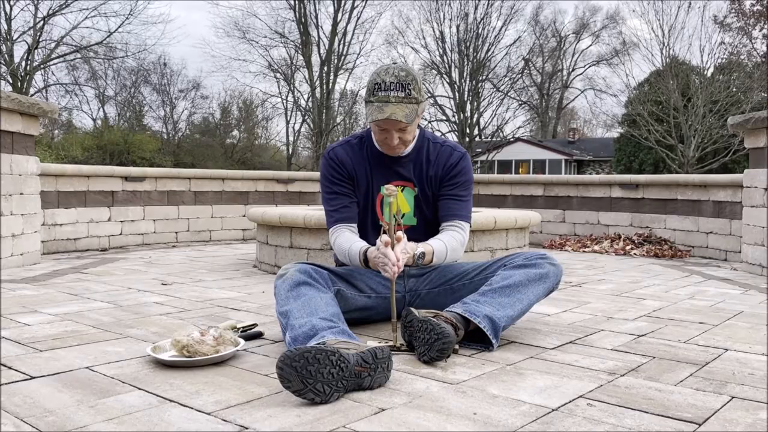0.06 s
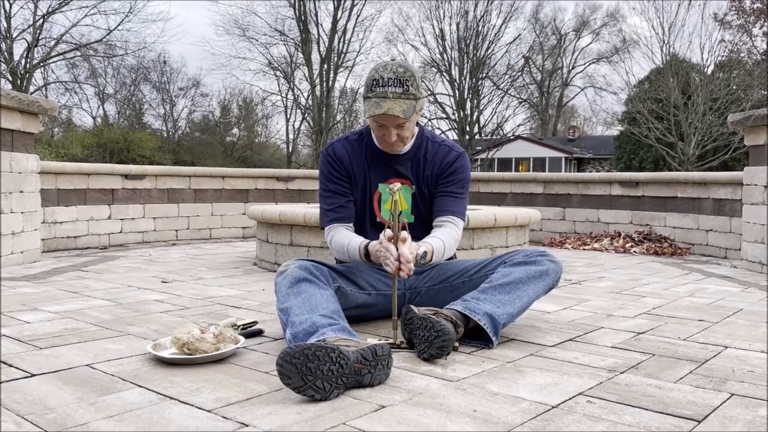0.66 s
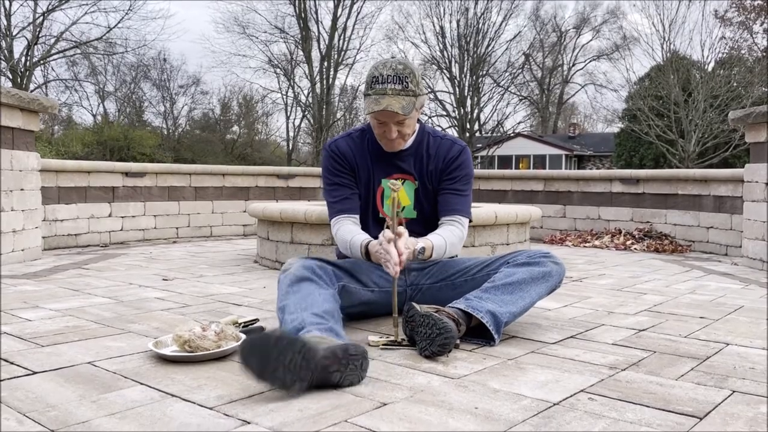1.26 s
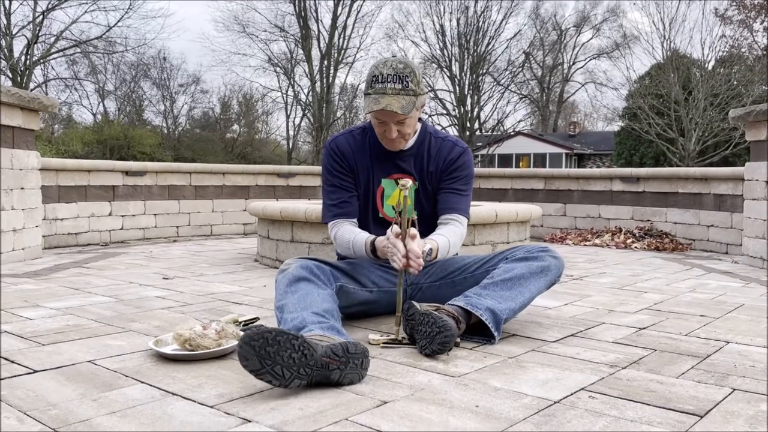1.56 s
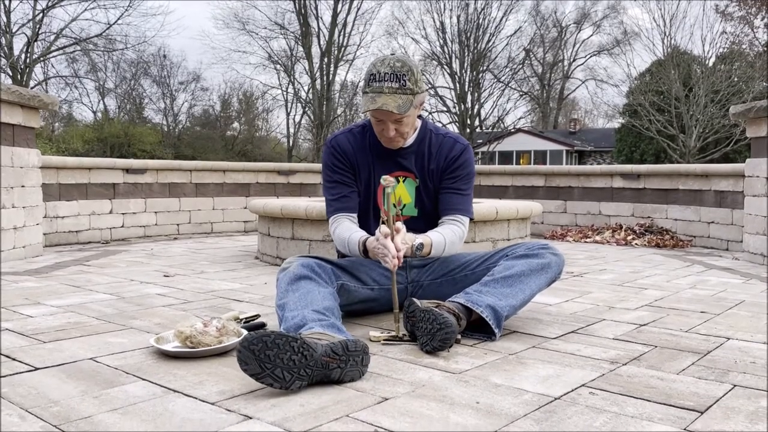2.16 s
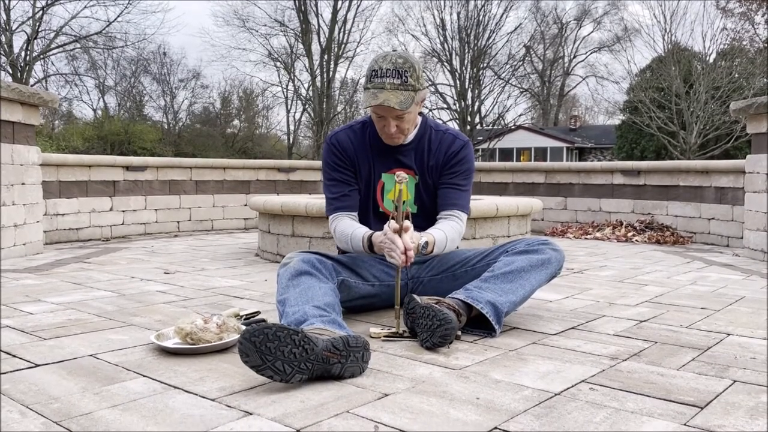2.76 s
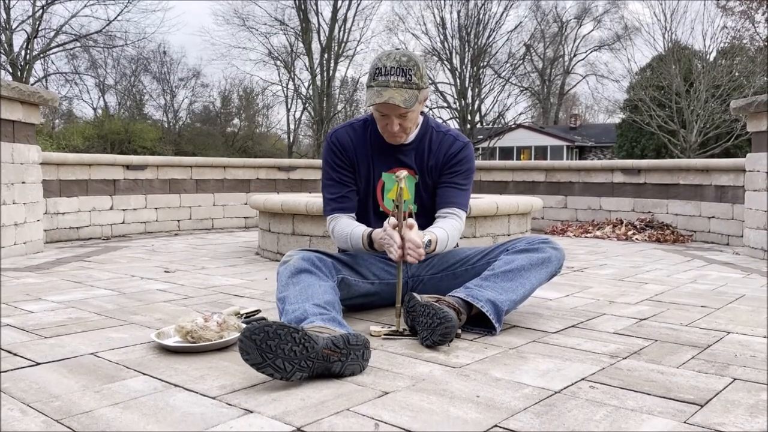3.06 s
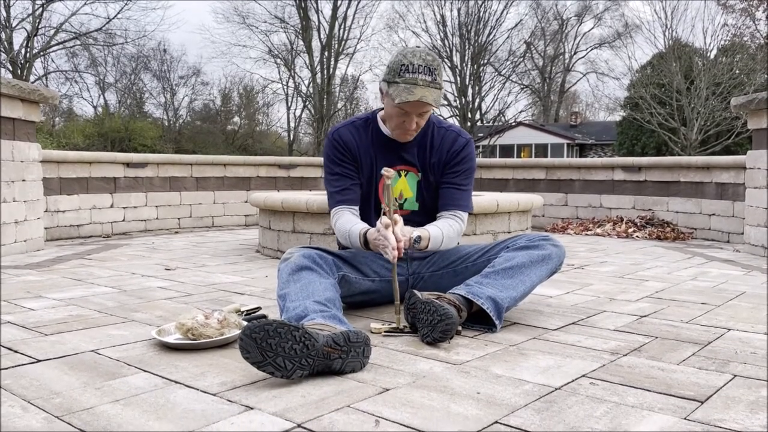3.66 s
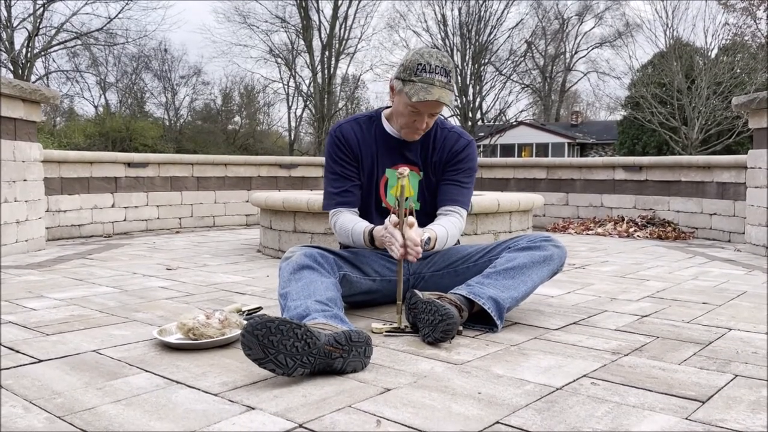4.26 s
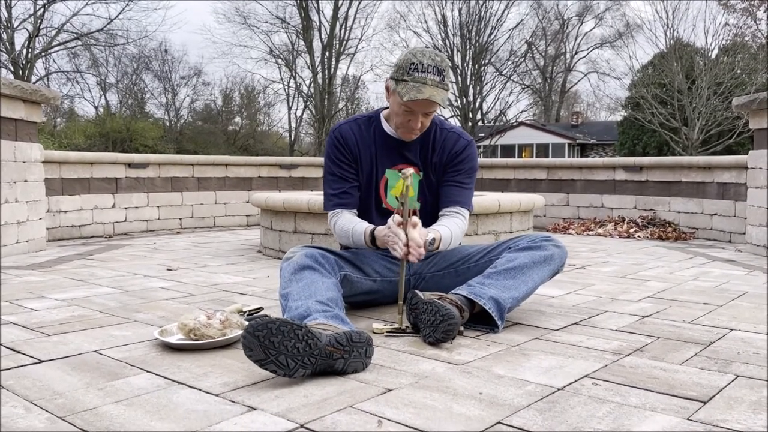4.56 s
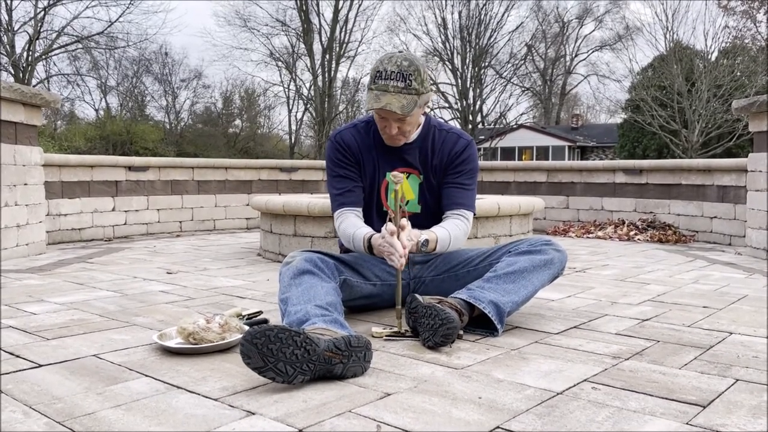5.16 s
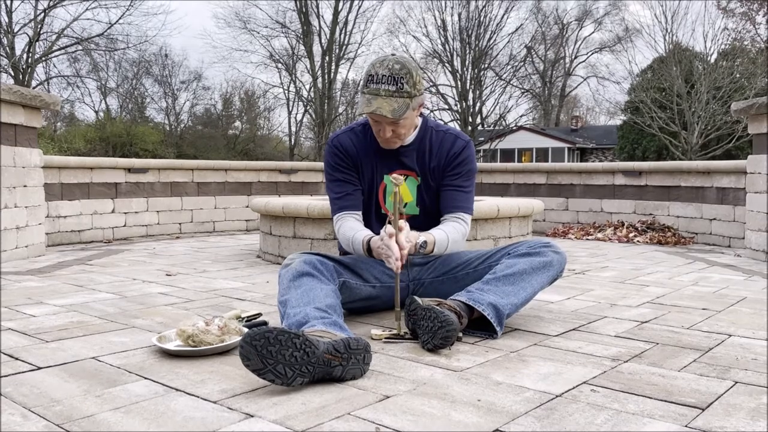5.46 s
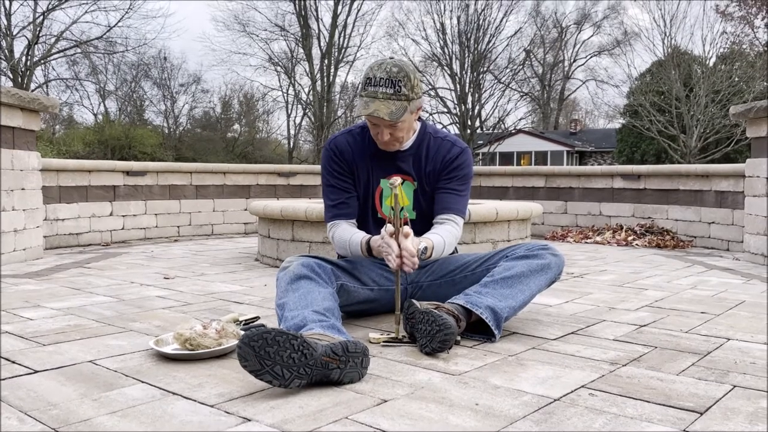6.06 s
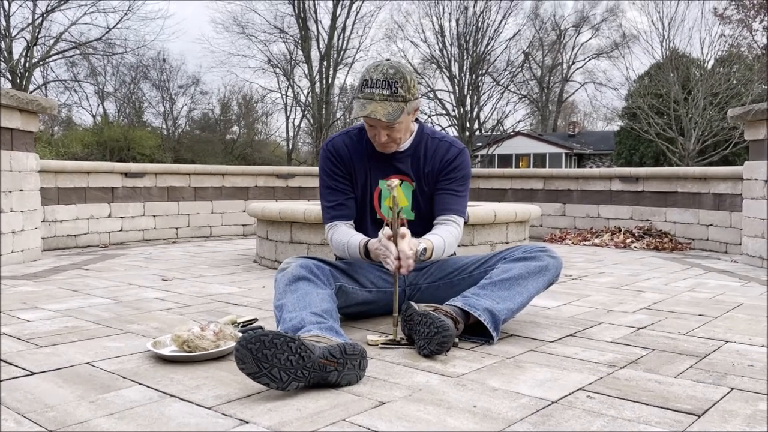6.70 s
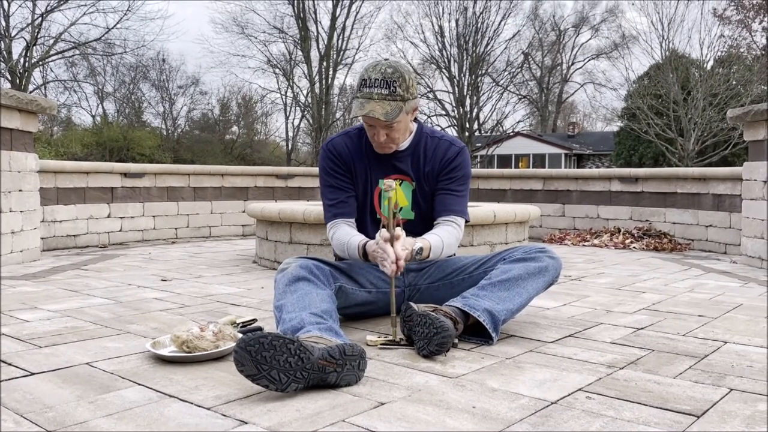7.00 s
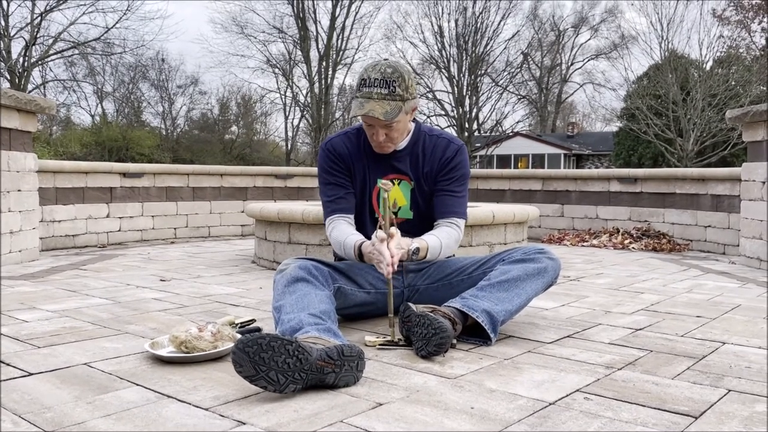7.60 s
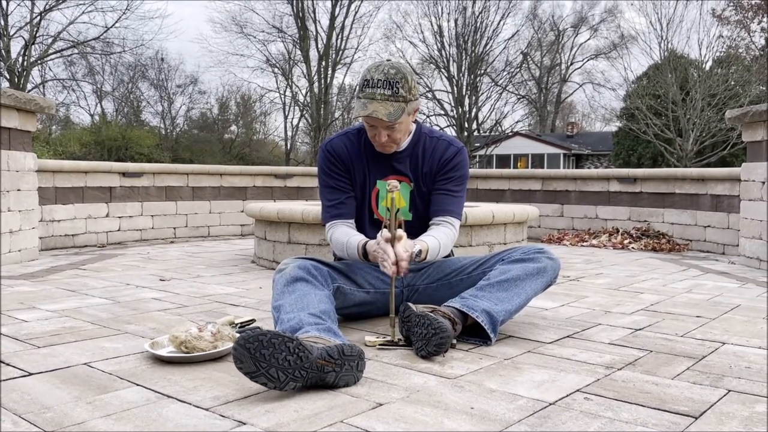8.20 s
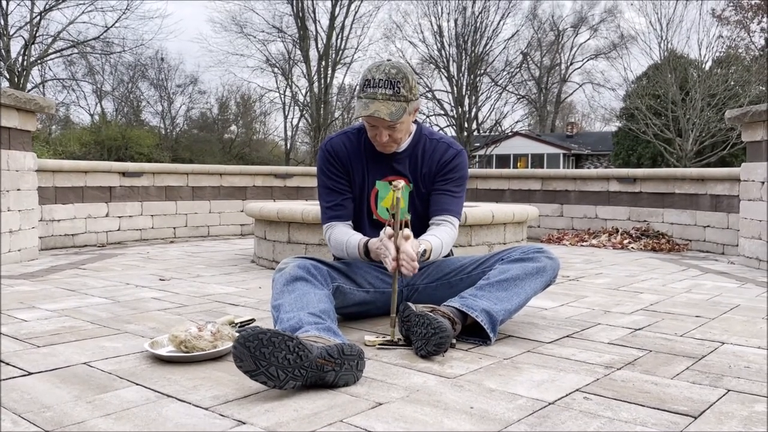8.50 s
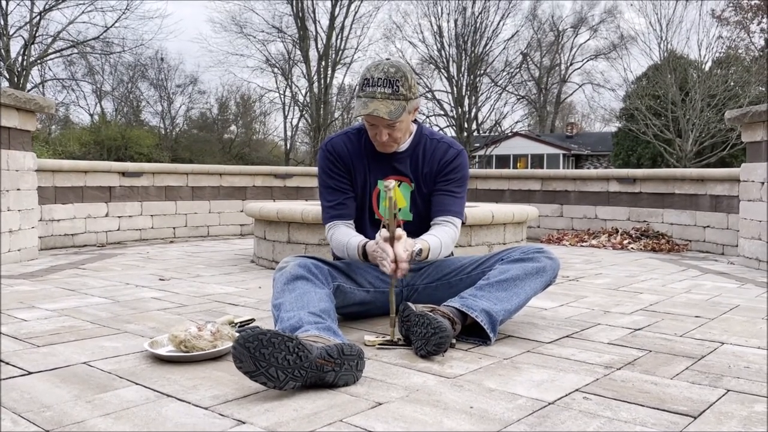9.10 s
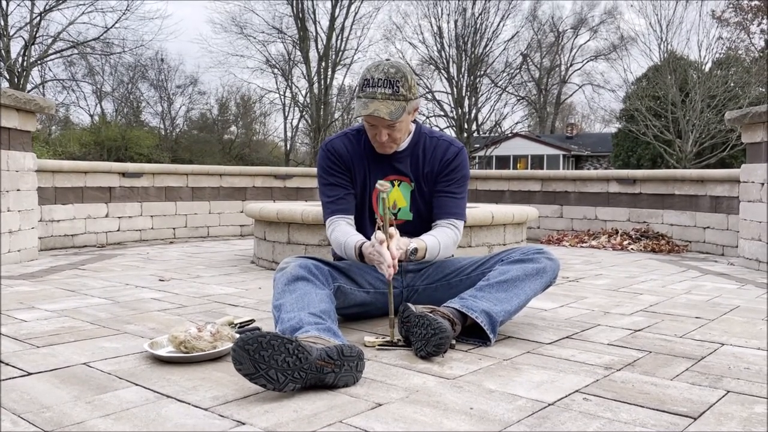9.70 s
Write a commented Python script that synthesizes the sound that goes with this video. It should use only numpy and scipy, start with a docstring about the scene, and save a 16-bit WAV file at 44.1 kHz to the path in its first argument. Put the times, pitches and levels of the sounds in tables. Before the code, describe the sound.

A wooden spindle is spun back and forth on a wooden board, close in front, on an open stone patio. For about ten seconds its dry, raspy rub swells and dies with each stroke, quickening from under five to nearly six strokes a second while growing softer and fuller in tone. Between 1 and 1.4 seconds a boot scuffs gritty paving and taps twice. Tiny gliding squeaks come from about 1.8 to 5.3 seconds, and again near 9. The tip first ticks in its socket around 2.8 seconds, then clicks ever more often from 4 onward, with scattered small hollow knocks. Soft low thumps fall around 2.2 to 2.6 and 4.6 to 5.2 seconds, and a faint bump at 9.3. Distant traffic rumbles and hisses all around throughout, while a deep engine hum swells from 3 to 5.5 seconds and then fades.

```python
"""A wooden spindle is rolled back and forth between the palms on a hearth board, on an open stone patio.
Each stroke is a swell of dry rubbing that dies away as the spindle turns round. The tip squeaks now
and then; as the work speeds up, it catches, ticks and knocks in its socket.
A boot scuffs and taps the gritty paving early on, and a soft bump comes near the end.
A distant engine and traffic drone behind, with a few soft low thumps."""
import sys
import numpy as np
from scipy import signal
from scipy.fft import rfft, irfft
from scipy.io import wavfile

SR = 44100
rng = np.random.default_rng(int(sys.argv[2]) if len(sys.argv) > 2 else 0)


def store_wav(level_fs):
    """Save 16-bit WAV to argv[1]."""
    pcm = np.round(np.clip(np.atleast_2d(level_fs), -1, 1) * 32767)
    wavfile.write(sys.argv[1], SR, pcm.T.astype(np.int16))


N = 434385
TIME = np.arange(N) / SR
HZ = np.maximum(np.fft.rfftfreq(N, 1 / SR), 1)

# hand strokes, quieter as the socket wears smooth: (start [s], relative level [dB])
HAND_STROKES = [(-.17, -60), (.048, -54), (.265, -57), (.491, -55), (.715, -57.5), (.933, -53.5),
                (1.147, -54.5), (1.362, -52.5), (1.563, -53), (1.749, -55.5), (1.945, -54), (2.144, -54),
                (2.342, -53.5), (2.519, -55), (2.718, -55.5), (2.919, -54.5), (3.116, -57), (3.313, -55.5),
                (3.508, -55), (3.687, -56), (3.87, -54.5), (4.052, -56), (4.261, -56.5), (4.448, -56),
                (4.63, -55.5), (4.808, -56.5), (4.998, -56.5), (5.178, -56.5), (5.349, -57.5),
                (5.535, -59.5), (5.718, -57), (5.891, -60), (6.081, -59.5), (6.26, -59.5), (6.434, -62),
                (6.614, -60.5), (6.795, -58), (6.953, -59.5), (7.13, -58.5), (7.292, -59.5), (7.479, -59),
                (7.657, -59.5), (7.826, -58), (8.001, -59.5), (8.169, -59.5), (8.342, -58.5),
                (8.528, -62.5), (8.692, -60.5), (8.869, -62), (9.04, -61.5), (9.207, -60), (9.377, -59.5),
                (9.553, -60), (9.712, -59), (9.88, -59)]
# how sharply the rub peaks in mid-stroke, most in the slow opening: (time [s], exponent of speed [-])
STROKE_PEAKING = [(0, 2.16), (1.3, 0.97), (5, 0.79), (7, 1.17)]
# tone of dry wood under light and under firm pressure: (frequency [Hz], gain [dB])
LIGHT_RUB_EQ = [(500, -30), (800, -13), (1200, -1), (1850, 1.5), (2300, 4.5), (3400, 2.5), (4500, -0.5),
                (5500, 1.5), (6400, 1), (7600, -9), (9500, -4.5), (11500, -10), (13500, -13), (15400, -12)]
FIRM_RUB_EQ = [(500, 5), (800, 9.5), (1200, 4.5), (1850, 0.5), (2300, 2.5), (3400, 4), (4500, -0.5),
               (5500, 0.5), (6400, 0), (7600, -4), (9500, -1.5), (11500, -6.5), (13500, -11), (15400, -7.5)]
def rubbing(level_db, chatter_db, creep, chafe_db, groan_db, sing_db, splinter_db):
    """Speed rises and falls once a stroke; the rub follows it and hardens as the hands bear down."""
    place = strokes_done()
    stroke = place.astype(int)
    rest = .05  # share of a stroke, at each end, for which the spindle all but stands still
    speed = np.sin(np.pi * np.clip((place % 1 - rest) / (1 - 2 * rest), 0, 1))
    firmness = np.clip((TIME - .8) / 5, 0, 1)
    light = friction(LIGHT_RUB_EQ, grains_per_s=1400, spread_db=-1, grain_share=.23)
    firm = friction(FIRM_RUB_EQ, grains_per_s=1200, spread_db=1, grain_share=.29)
    rub = grip(np.sqrt(1 - firmness) * light + np.sqrt(firmness) * firm, stroke)
    chafe = from_db(chafe_db) * chafing(speed, stroke, bend=.12, width_hz=120, spread_db=7.5)
    # the spindle's lowest mode groans on and off; a higher one sings in mid-stroke
    groan = from_db(groan_db + 9 * drift(5)) * rough_tone(1470, width_hz=130)
    sing = from_db(sing_db + 3.3 * drift(2.6)) * rough_tone(3480 * np.exp(.042 * drift(3)), width_hz=73)
    splinter = from_db(splinter_db) * splinters(per_s=400, spread_db=9, edge_hz=6900)
    force_db = np.array(HAND_STROKES)[stroke, 1] + surges() + chatter_db * drift(32)
    peaking, = in_time(STROKE_PEAKING)
    swell = (creep + speed ** peaking) * from_db(force_db + level_db)  # only creep is left at the turns
    return swell * (rub + speed * (chafe + sing) + groan + splinter)


def strokes_done():
    """Running count of hand strokes; whole numbers are the turns."""
    return np.interp(TIME, np.array(HAND_STROKES)[:, 0], np.arange(len(HAND_STROKES)))


# accents within a stroke: (time [s], boost [dB])
PRESSURE_ACCENTS = [(.15, 3.5), (.595, 1.5), (1.88, 3.5), (2.185, 0.5), (2.64, 3.5), (3.735, 2), (5.265, 2),
                    (6.53, 6.5), (7.74, 2.5), (8.08, -1), (8.45, -1), (8.6, 5)]
def surges(width_s=.015):
    """The hands bear down or ease off for a moment; the change in dB."""
    return sum(db * bell(s, width_s) for s, db in PRESSURE_ACCENTS)


def friction(eq, grains_per_s, spread_db, grain_share):
    """Fibres snap as tiny grains over a smooth hiss, coloured by the wood."""
    sizes = from_db(spread_db * np.minimum(rng.exponential(1, N), 4))
    born = rng.random(N) < grains_per_s / SR
    grains = rms_one(rng.standard_normal((2, N)) * sizes * born)
    force = np.sqrt(grain_share) * grains + np.sqrt(1 - grain_share) * rng.standard_normal((2, N))
    gain = from_db(at_hz(eq)) * wood_gain() / np.sqrt(1 + (400 / HZ) ** 4)
    rasp_band = (HZ > 2500) & (HZ < 6500)
    return stereo(force, gain / np.sqrt(np.mean(gain ** 2 * rasp_band)), FRONT_IMAGE)


# resonances of spindle and board: (frequency [Hz], width [Hz], strength [dB])
WOOD_MODES = [(1442, 84, 9.5), (2494, 140, 2.5), (3473, 480, 2), (4090, 164, 6.5), (4540, 100, 3.5),
              (5430, 520, 1.5), (6800, 240, 6)]
def wood_gain():
    """Broad response of spindle and board with their modes standing out of it."""
    peaks = sum(from_db(db) ** 2 / (1 + (2 * (HZ - hz) / width) ** 2) for hz, width, db in WOOD_MODES)
    return np.sqrt(1 + peaks)


def grip(rub, stroke, grip_db=2.2, slide_db=2.2):
    """Each new grip lifts some resonances and damps others; they shift as the palms slide."""
    centres, spacing = np.linspace(1800, 7000, 14, retstep=True)
    spectrum, out = rfft(rub), rub
    for hz in centres:
        band = irfft(spectrum * np.maximum(1 - abs(HZ - hz) / spacing, 0), N)
        colour_db = grip_db * per_stroke(stroke) + slide_db * drift(14)
        out = out + band * (rms_one(from_db(np.minimum(colour_db, 5))) - 1)
    return out


def chafing(speed, stroke, bend, width_hz, spread_db):
    """High spots of the tip rasp in flares, at pitches that are new each stroke and rise with speed."""
    out = 0
    for home_hz in np.geomspace(2100, 5200, 11):
        hz = home_hz * np.exp(.04 * per_stroke(stroke) + bend * (speed - 1))
        out = out + rough_tone(hz, width_hz) * from_db(spread_db * np.minimum(drift(30), 2))
    return rms_one(out)


def splinters(per_s, spread_db, edge_hz):
    """Brittle fibres break one by one and give the rub a dry, bright bite."""
    sizes = from_db(spread_db * np.minimum(rng.exponential(1, N), 3)) * rng.choice([-1, 1], (2, N))
    born = rng.random(N) < per_s / SR
    treble = 1 / np.sqrt((1 + (edge_hz / HZ) ** 12) * (1 + (HZ / 11500) ** 6))
    return rms_one(stereo(sizes * born, treble, FRONT_IMAGE))


# the tip catches in its socket:
# (time [s], relative crack level [dB], body re crack [dB], snap re crack [dB], ring pitch [Hz])
TIP_CATCHES = [(2.8171, -42, 2.5, -12, 3516), (2.9034, -50, -4, -8, 3120), (2.949, -53, 4, -15, 3030),
               (3.8494, -45, -15, -7, 4670), (3.9586, -47, -12, -5, 4000), (3.967, -32, -5, -13, 5250),
               (4.0878, -51, -5, -7, 3550), (4.107, -48.5, 0, -10, 3880), (4.1591, -41, -16, -8, 5320),
               (4.4152, -45, -7, -9, 2430), (4.486, -50, -1, -3, 2410), (5.1595, -40, -1, -6.5, 3570),
               (5.3792, -47.5, -3, -13, 4070), (5.4566, -45, -4, -10, 4050), (5.4989, -43, -15, -6, 3400),
               (5.8637, -51, -12, -7, 3646), (6.1174, -52.5, -6, 3, 4440), (6.2506, -51, -11, -6, 3520),
               (6.4755, -49.5, 7.5, -7, 2410), (6.6447, -42.5, -3, -5, 3570),
               (6.7637, -40.5, -3.5, -5.5, 4800), (6.8596, -38, -20, -13, 5380),
               (6.9214, -44.5, -4.5, -9, 4540), (6.982, -45.5, -8, -4, 5600), (7.089, -40.5, -15, -3, 4490),
               (7.117, -51.5, -2, -14, 4540), (7.1496, -53, -4, -17, 4460), (7.315, -41.5, -1.5, -2, 3450),
               (7.508, -51.5, -2, -12, 4590), (7.565, -40, -5, -6, 3680), (7.6212, -40.5, -3, -8.5, 4420),
               (7.7849, -41, -22, -11, 5730), (7.9535, -44, -14, -4, 4520), (7.9852, -43, -4, -5.5, 3083),
               (8.2545, -45.5, 2, -19, 4070), (8.3823, -47, -2, -14, 2950), (8.507, -41.5, -8, -2, 3180),
               (8.54, -47.5, -18, -9, 4590), (8.7197, -44.5, -20, -11, 3290),
               (8.8483, -43, -20, -3.5, 4074), (8.882, -45.5, -20.5, -10, 5110),
               (8.9376, -41.5, -14, -5, 4680), (8.9436, -45, -2, -17, 2530), (9.073, -40.5, -2, -9, 4420),
               (9.0907, -47, -17, -10, 3450), (9.1128, -42.5, -12.5, -4, 3420),
               (9.1636, -44.5, -3, -24, 3100), (9.2243, -47, -15, -9, 3240), (9.2935, -45.5, -6, 1, 4650),
               (9.333, -47.5, -15, -7, 3530), (9.4022, -37, -8.5, -6.5, 5580),
               (9.4912, -47.5, 4.5, -22, 4094), (9.4994, -43.5, -14, -7, 4130),
               (9.528, -42.5, -16, -8, 3640), (9.7365, -38, -6, -6, 2990), (9.8238, -39.5, -5, -24.5, 4080),
               (9.8326, -42, -22, -17, 4480)]
# body, crack and snap of a tick: (low cut [Hz], high cut [Hz], decay [s], attack [s], trim [dB])
TICK_LAYERS = [(1150, 2580, 0.0013, 0.00018, -0.5), (2420.5, 6300, 0.00058, 0.00027, -1.5),
               (6040, 13800, 0.00042, .0002, 6)]
def ticks(level_db, tail_db, tail_s, ring_db, ring_s, echo_db, echo_s):
    """Each catch is a tiny burst of slips, echoed off the paving about 2 ms later; the spindle rings at a pitch
    set by the grip."""
    t = TIME[:SR // 25]
    starts, crack_db, body_db, snap_db, ring_hz = np.vstack([TIP_CATCHES, faint_catches()]).T
    echo_delay = echo_s * np.exp(.13 * rng.standard_normal((len(starts), 1, 1)))
    since_echo = np.maximum(t - echo_delay, 0)
    rings = np.sin(2 * np.pi * np.outer(ring_hz, t)) * np.exp(-t / ring_s) * (1 - np.exp(-t / .0003))
    rings *= from_db(crack_db + ring_db)[:, None] / rings.std(axis=1, keepdims=True)
    clicks = rings[:, None] * [[1], [0]]  # the ring sits in the centre
    layer_dbs = crack_db + body_db, crack_db, crack_db + snap_db
    for (low_hz, high_hz, decay, attack, trim_db), layer_db in zip(TICK_LAYERS, layer_dbs):
        band = signal.butter(2, [low_hz, high_hz], "band", fs=SR, output="sos")
        envelope = 0
        for age, gain in (t, 1), (since_echo, from_db(echo_db)):
            fall = np.exp(-age / decay) + from_db(tail_db) * np.exp(-age / tail_s)
            envelope = envelope + gain * fall * (1 - np.exp(-age / attack))
        bursts = signal.sosfilt(band, rng.standard_normal(clicks.shape) * envelope)
        clicks += from_db(layer_db + trim_db)[:, None, None] * bursts / bursts.std(axis=2, keepdims=True)
    train = np.zeros((2, N + len(t)))
    for s, click in zip(starts, clicks):
        at = round(s * SR)
        train[:, at:at + len(t)] += click
    return from_db(level_db) * stereo(train[:, :N], wood_gain(), FRONT_IMAGE)


def faint_catches(worn_s=3.8, chance_growth_per_s=.1):
    """Once the socket is worn, the tip catches ever more often near the turns; rows as in TIP_CATCHES."""
    place = strokes_done()
    chances = np.add.outer(np.arange(1, int(place[-1])), (.22, .8)).ravel()  # early and late in a stroke
    shift, pitch, body, snap = rng.standard_normal((len(chances), 4)).T
    starts = np.interp(chances + .07 * shift, place, TIME)
    caught = rng.random(len(starts)) < chance_growth_per_s * (starts - worn_s)
    crack_db = np.where(caught, -62.5, -np.inf)
    return np.transpose([starts, crack_db, -10 + 1.5 * body, -15 + 1.5 * snap, 4000 * np.exp(.15 * pitch)])


# hollow wooden knocks: (time [s], relative level [dB], pitch [Hz], decay [s])
SOCKET_KNOCKS = [(3.967, -48, 1440, 0.009), (4.161, -44, 1520, 0.0075), (4.486, -47, 2040, .0025),
                 (6.645, -40.5, 2040, 0.0029), (7.621, -40.5, 2036, 0.0027), (8.254, -41, 1289, 0.0054),
                 (9.113, -45, 1450, 0.0071), (9.163, -50.5, 1515, 0.0064)]
def knocks(level_db):
    """The spindle strikes the side of its socket and rings."""
    return struck_modes(SOCKET_KNOCKS, level_db)


# dry squeaks: (time [s], relative level [dB], half-length [s], pitch [Hz], glide [octaves/s])
TIP_SQUEAKS = [(1.839, -58, 0.03, 2860, 5), (2.067, -55.5, 0.013, 3630, -3.5), (2.23, -53, 0.017, 2480, 6),
               (2.6, -58, .022, 2480, 8), (3.345, -72, .014, 3450, 0), (3.725, -57.5, .012, 3300, -3.5),
               (4.688, -56, 0.016, 2400, 7), (4.724, -63, .01, 1480, 1), (4.94, -54, 0.0057, 2220, 0.5),
               (5.053, -55.5, 0.012, 2360, 6), (5.259, -59, 0.01, 1560, 8), (8.953, -53.5, .011, 2500, -13)]
def squeaks(level_db, width_hz):
    """Now and then the tip sings for a moment, mostly sliding up or down in pitch."""
    hz, level = np.zeros(N), np.zeros(N)
    for s, db, half_length, centre_hz, glide in TIP_SQUEAKS:
        near = abs(TIME - s) < 3 * half_length
        hz[near] = centre_hz * 2 ** (glide * (TIME[near] - s))
        level[near] = from_db(db + level_db) * bell(s, half_length)[near]
    return level * rough_tone(hz, width_hz)


# scuffs on the paving: (time [s], level [dB], decay [s])
BOOT_SCUFFS = [(1.036, -44, 0.017), (1.061, -39, 0.0097), (1.078, -44, 0.006), (1.094, -59, 0.0054),
               (1.222, -39, 0.0054), (1.328, -45, 0.008)]
# dull tone of the sole: (frequency [Hz], gain [dB])
SOLE_EQ = [(150, -4), (300, 0), (450, -5), (650, -3), (900, -7), (1150, 1.5), (1400, -16), (1900, -16),
           (3500, -15), (9000, -58)]
def boot_scuffs(attack_s):
    """A rubber sole drags and lands: short bursts of grit, softened and dulled by the sole."""
    touch = 0
    for s, db, decay in BOOT_SCUFFS:
        attack = np.clip((TIME - s) / attack_s + .5, 0, 1)
        touch = touch + from_db(db) * attack * np.exp(-np.clip((TIME - s) / decay, 0, 40))
    return stereo(touch * rng.standard_normal((2, N)), rms_one(from_db(at_hz(SOLE_EQ))), SURROUND_IMAGE)


def grit(at_s, level_db, width_s, grains_per_s):
    """Bright, sparse grains crunch, swelling and fading as the sole slides."""
    grains = rng.standard_normal((2, N)) * (rng.random(N) < grains_per_s / SR)
    low_cut = 1 / np.sqrt(1 + (900 / HZ) ** 2)
    return from_db(level_db) * bell(at_s, width_s) * rms_one(stereo(grains, low_cut, FRONT_IMAGE))


# light taps: (time [s], relative level [dB], pitch [Hz], decay [s])
BOOT_TAPS = [(1.2195, -34.5, 830, 0.0036), (1.3265, -36.5, 1000, 0.003)]
def boot_taps(level_db):
    """The boot taps the paving with a very short ring."""
    return struck_modes(BOOT_TAPS, level_db)


# a soft bump: (time [s], relative level [dB], pitch [Hz], decay [s])
SOFT_BUMP = [(9.288, -47.5, 300, 0.015)]
def bump(level_db):
    """One low, damped note sounds near the drill."""
    return struck_modes(SOFT_BUMP, level_db)


# bass thumps: (time [s], peak level [dB], pitch [Hz], half-length [s])
LOW_THUMPS = [(2.175, -28, 65, 0.012), (2.539, -29.5, 67.4, 0.017), (2.571, -32, 82, 0.016),
              (2.625, -25, 65.7, 0.013), (4.578, -16.5, 82.4, 0.004), (5.053, -26, 56.7, 0.014),
              (5.115, -26.5, 83.4, 0.016), (5.19, -27.5, 66.3, 0.0068)]
def thumps():
    """Soft swells of pressure, a few cycles long at most."""
    return sum(from_db(db) * np.cos(2 * np.pi * hz * (TIME - s)) * bell(s, half_length)
               for s, db, hz, half_length in LOW_THUMPS)


# a distant engine swells and fades:
# (time [s], firing rate [Hz], first order [dB], fourth order [dB], sixth order [dB])
ENGINE_SWELL = [(0, 59.77, -43.5, -65, -84), (1, 59.55, -46.5, -67, -79), (2.5, 59.76, -46.5, -63.5, -76),
                (3.2, 60.63, -39, -68, -72), (4.3, 60.8, -38, -65.5, -77.5),
                (5.4, 61.43, -38, -63.5, -82.5), (6, 61.6, -45.5, -60, -75),
                (6.7, 61.78, -54.5, -62, -74.5), (9.85, 61.57, -63, -68.5, -71.5)]
# tone of its deep boom: (frequency [Hz], gain [dB])
BOOM_EQ = [(20, -25), (33, -4), (43, 0), (56, 13), (80, -4), (160, -55), (600, -110)]
def engine(waver_db, wander):
    """Only the lowest orders and a deep boom carry this far; they waver on the way."""
    hz, first_db, fourth_db, sixth_db = in_time(ENGINE_SWELL)
    swell_db = first_db + 37.5  # near zero at the top of the swell
    second_db, boom_db = -45.5 + .79 * swell_db, -44.5 + swell_db
    phase = 2 * np.pi * np.cumsum(hz * (1 + wander * drift(3.3))) / SR
    orders = (1, first_db), (2, second_db), (4, fourth_db), (6, sixth_db)
    hum = sum(np.sqrt(2) * from_db(db + waver_db * drift(2.3)) * np.sin(k * phase) for k, db in orders)
    return hum + from_db(boom_db) * far_noise(BOOM_EQ)


# far traffic bed: (time [s], rumble level [dB], hiss level [dB])
TRAFFIC_BED = [(0, -43.5, -52.5), (1.5, -44, -52.5), (4.2, -44, -55), (6, -45.5, -57), (9.85, -46, -57.5)]
# a low drone that comes up in the second half: (time [s], level [dB], pitch [Hz])
TRAFFIC_DRONE = [(5.5, -77, 336.3), (6.8, -59, 330), (8, -70, 324), (9.4, -65, 336.5)]
# tone of road rumble and of tyre hiss: (frequency [Hz], gain [dB])
RUMBLE_EQ = [(20, -48), (32, -18), (45, -2.5), (57, -7), (72, 2), (100, -4), (135, -6), (170, -10.5),
             (210, -12.5), (290, -20), (400, -28), (600, -34), (3000, -110)]
TYRE_EQ = [(250, -17.5), (420, -3.5), (560, -2.5), (700, 2.5), (1000, 0.5), (1250, -3), (1550, -3),
           (1900, -8), (2400, -12.5), (3400, -22.5), (5000, -31), (9000, -43.5), (15500, -47)]
def traffic(rumble_flutter_db, hiss_flutter_db):
    """Road rumble and tyre hiss arrive from all around, with a low drone in the centre."""
    rumble_db, hiss_db = in_time(TRAFFIC_BED)
    drone_db, drone_hz = in_time(TRAFFIC_DRONE)
    rumble = far_noise(RUMBLE_EQ) * from_db(rumble_db + rumble_flutter_db * drift(9.8))
    hiss = far_noise(TYRE_EQ) * from_db(hiss_db + hiss_flutter_db * drift(6.8))
    return rumble + hiss + from_db(drone_db) * rough_tone(drone_hz, width_hz=92)


def far_noise(eq):
    """Coloured noise from all around; rms 1."""
    return rms_one(stereo(rng.standard_normal((2, N)), from_db(at_hz(eq)), SURROUND_IMAGE))


# early reflections off paving and low walls: (delay [s], level [dB])
PATIO_ECHOES = [(.0021, -34), (0.012, -23), (0.023, -24), (.034, -22.5)]
def patio(x):
    """The paving answers at once, the walls a little later."""
    return x + sum(from_db(db) * np.pad(x, ((0, 0), (round(delay * SR), 0)))[:, :N]
                   for delay, db in PATIO_ECHOES)


# how far the left port leads the right: (frequency [Hz], phase [rad])
PORT_LEAD = [(1800, 0), (2600, 0.72), (4200, 0.52), (5600, 0.3), (6100, -1.1), (6700, -3.2), (7800, -3.2),
             (9500, -1.05), (10500, 0.4), (11800, 0.8), (12800, 1.9), (13500, 2.8), (14700, 3.1),
             (15600, 2.5)]
def ports(x):
    """Treble from in front reaches the two microphone ports out of step."""
    lead = np.interp(HZ, *np.transpose(PORT_LEAD))
    return irfft(rfft(x) * np.exp(.5j * lead * [[1], [-1]]), N)


# stereo image of sound from in front and from all around: (frequency [Hz], left-right likeness [0 to 1])
FRONT_IMAGE = [(300, 0.6), (900, 0.95), (1500, 0.57), (2100, 1), (5500, 0.79), (6300, 0.62), (7100, 0.99),
               (8000, 0.67), (9500, 0.83), (11300, 0.46), (13000, 0.98), (15000, 0.8)]
SURROUND_IMAGE = [(60, 0.87), (130, 0.91), (250, 0.67), (500, 0.2), (800, 0.053), (1300, 0), (2000, 0.54),
                  (5000, 0.55), (7000, 0), (15000, 0.27)]
def stereo(mid_side, gain, image):
    """Two unrelated signals, coloured and blended into left and right."""
    alike = at_hz(image)
    mid, side = rfft(mid_side) * gain
    return irfft(np.sqrt((1 + alike) / 2) * mid + np.sqrt((1 - alike) / 2) * side * [[1], [-1]], N)


def struck_modes(blows, level_db, attack_s=.00014):
    """Each blow sets one mode ringing."""
    t, out = TIME[:SR // 10], np.zeros(N)
    for s, db, hz, decay in blows:
        at = round(s * SR)
        envelope = np.exp(-t / decay) * (1 - np.exp(-t / attack_s))
        out[at:at + len(t)] += from_db(db + level_db) * envelope * np.sin(2 * np.pi * hz * t)
    return out


def rough_tone(hz, width_hz):
    """A narrow, randomly driven resonance that glides along hz."""
    phase = 2 * np.pi * np.cumsum(hz + np.zeros(N)) / SR
    return (drift(width_hz) * np.cos(phase) + drift(width_hz) * np.sin(phase)) / np.sqrt(2)


def drift(rate_hz):
    """Smooth random modulation with spread 1: noise at every 16th sample, low-passed twice."""
    pole = np.exp(-2 * np.pi * rate_hz * 16 / SR)
    noise = rng.standard_normal(N // 16 + 2002)
    slow = signal.lfilter([1], [1, -2 * pole, pole * pole], noise)[2000:]
    return np.interp(np.arange(N) / 16, np.arange(len(slow)), rms_one(slow))


def per_stroke(stroke):
    """A new random value held through each stroke."""
    return rng.standard_normal(stroke[-1] + 1)[stroke]


def bell(at_s, width_s):
    """A smooth swell that peaks at 1."""
    return np.exp(-np.minimum(((TIME - at_s) / width_s) ** 2, 80) / 2)


def in_time(rows):
    """Each column of a curve at every sample."""
    s, *columns = np.transpose(rows)
    return [np.interp(TIME, s, column) for column in columns]


def at_hz(points):
    """A curve at every frequency."""
    hz, value = np.transpose(points)
    return np.interp(np.log(HZ), np.log(hz), value)


def from_db(db):
    return 10 ** (np.asarray(db) / 20)


def rms_one(x):
    return x / np.sqrt(np.mean(x ** 2) + 1e-20)


def scene():
    """The drill is up front, the boot close by, the traffic far off and all around."""
    rub = rubbing(level_db=-2.5, chatter_db=1.83, creep=.035,
                  chafe_db=-3, groan_db=-18, sing_db=-14.5, splinter_db=-17)
    catches = ticks(level_db=-17.5, tail_db=-28, tail_s=.0067, ring_db=-5.5, ring_s=.0014,
                    echo_db=-7.5, echo_s=.00203)
    drill = rub + patio(catches) + knocks(level_db=2.5) + squeaks(level_db=3.5, width_hz=200)
    far = traffic(rumble_flutter_db=1.5, hiss_flutter_db=1) + engine(waver_db=1.25, wander=.0029)
    boot = boot_scuffs(attack_s=.0016) + boot_taps(level_db=.5)
    crunch = grit(at_s=1.056, level_db=-46, width_s=.014, grains_per_s=2800)
    return ports(drill + crunch) + boot + bump(level_db=.5) + thumps() + far


# tonal balance of the two sides: (frequency [Hz], left minus right [dB])
SIDE_BALANCE = [(100, -1.75), (380, -1), (700, -0.5), (2300, 1), (4400, 0)]
def record(dry, cutoff_hz=16300):
    """The two sides differ a little in colour; the top is cut steeply."""
    tilted = irfft(rfft(dry) * from_db(at_hz(SIDE_BALANCE) * [[.5], [-.5]]), N)
    return signal.sosfilt(signal.ellip(10, .1, 80, cutoff_hz, fs=SR, output="sos"), tilted)


dry = scene()
out = record(dry)
store_wav(out)
```